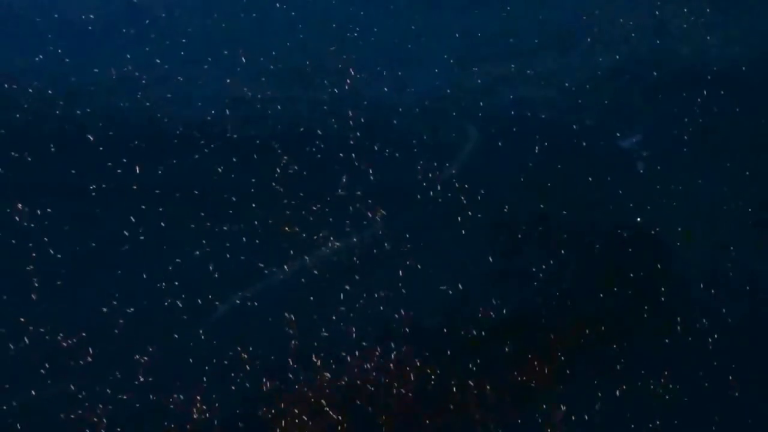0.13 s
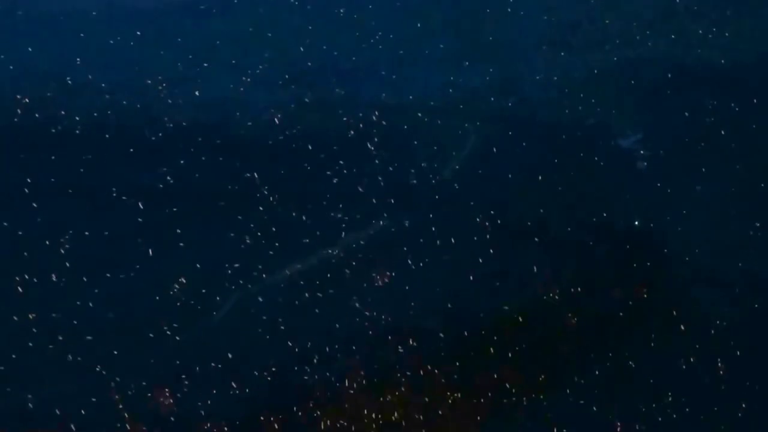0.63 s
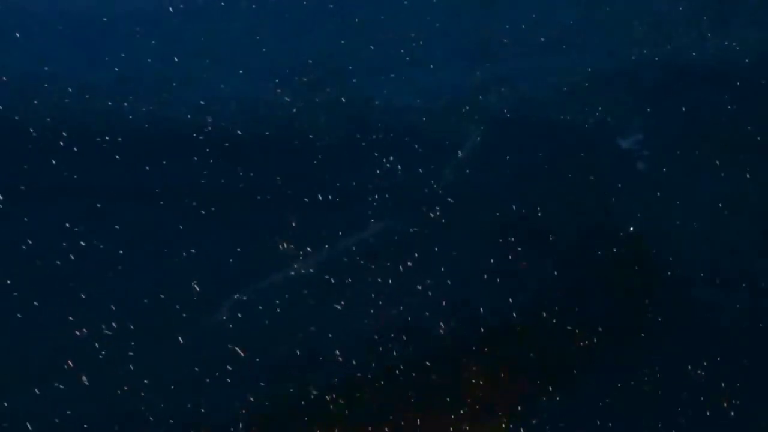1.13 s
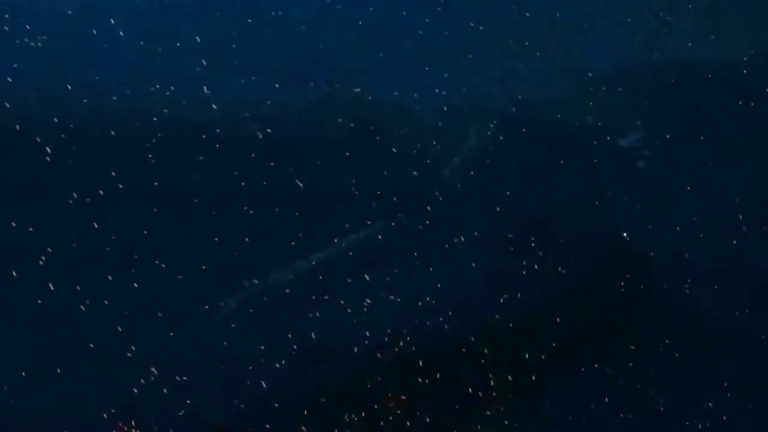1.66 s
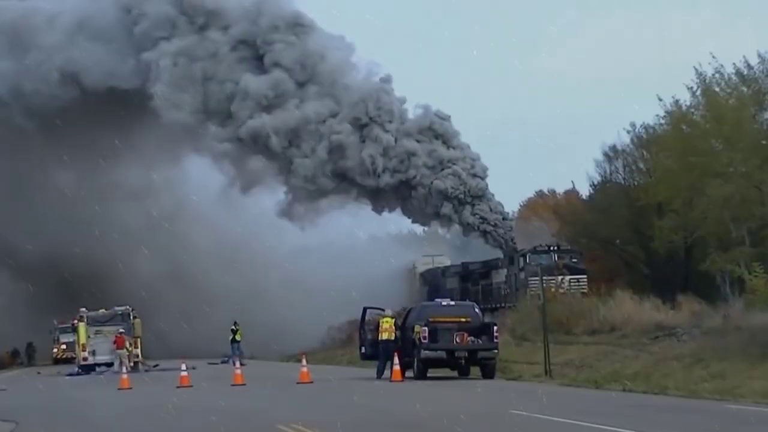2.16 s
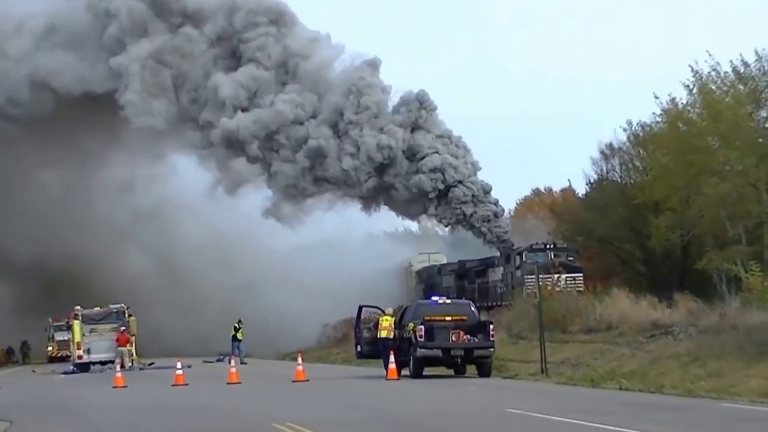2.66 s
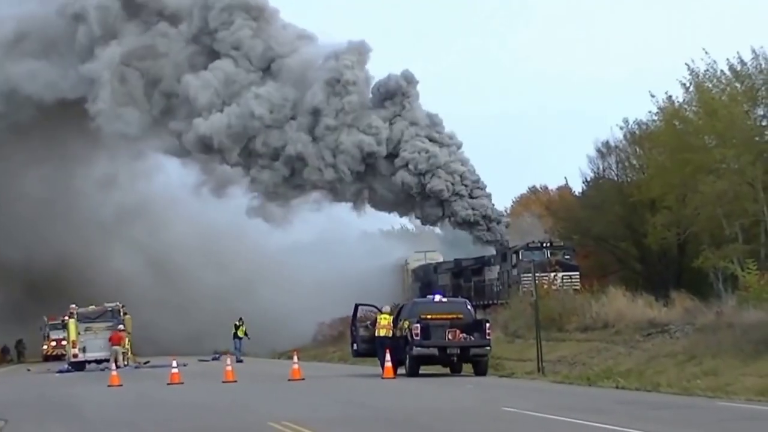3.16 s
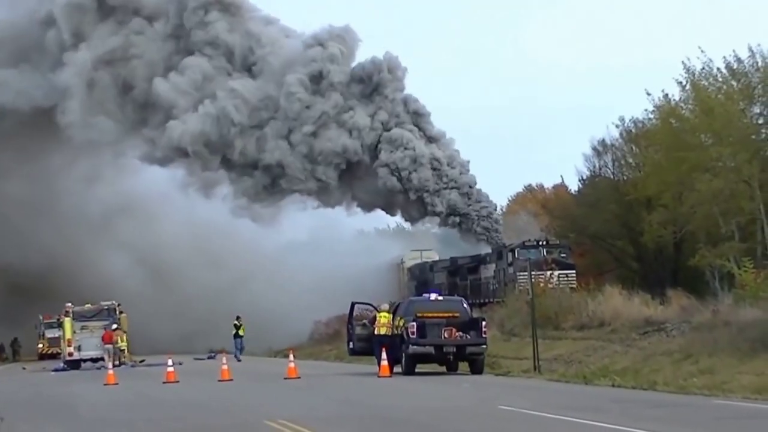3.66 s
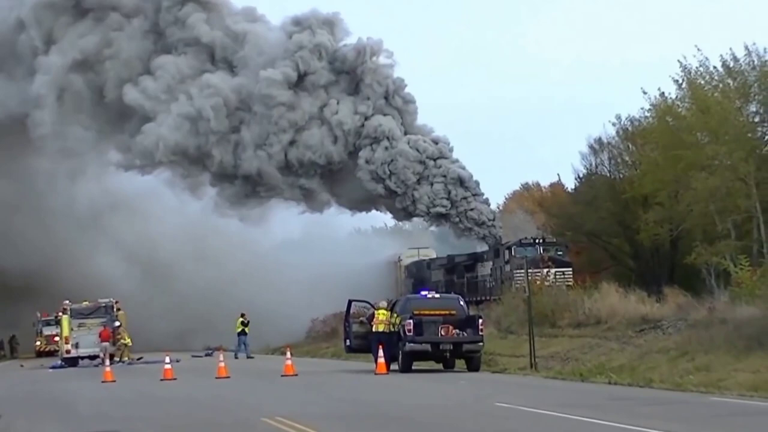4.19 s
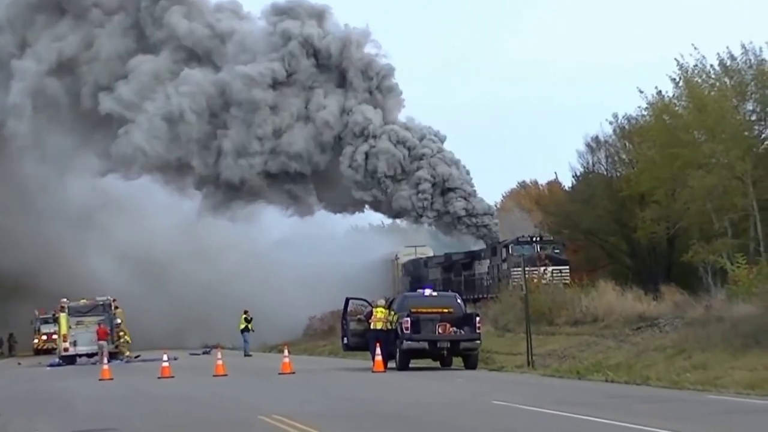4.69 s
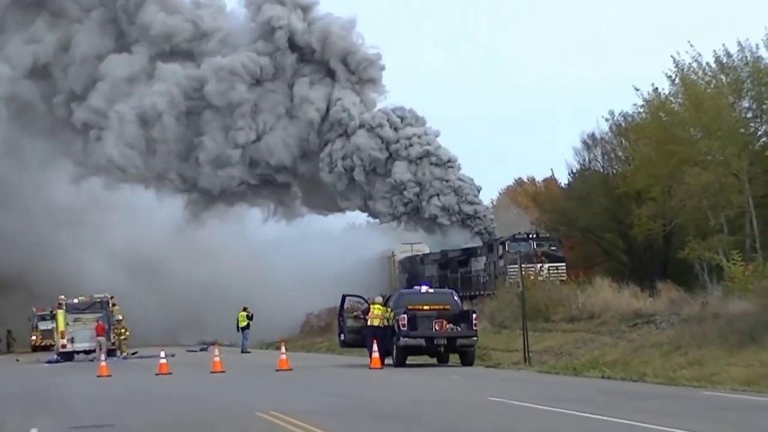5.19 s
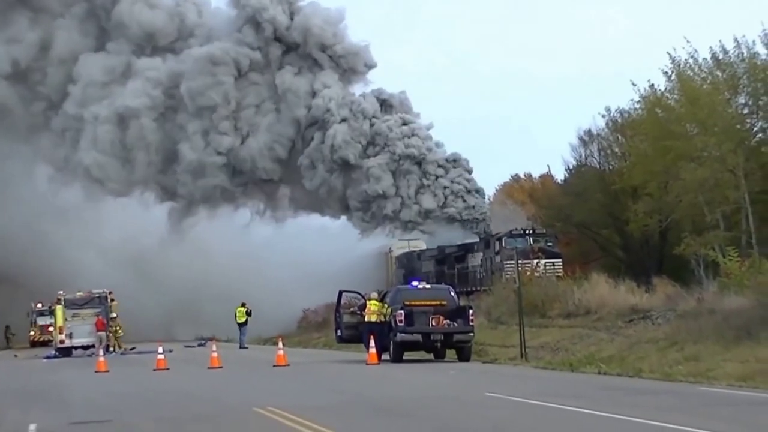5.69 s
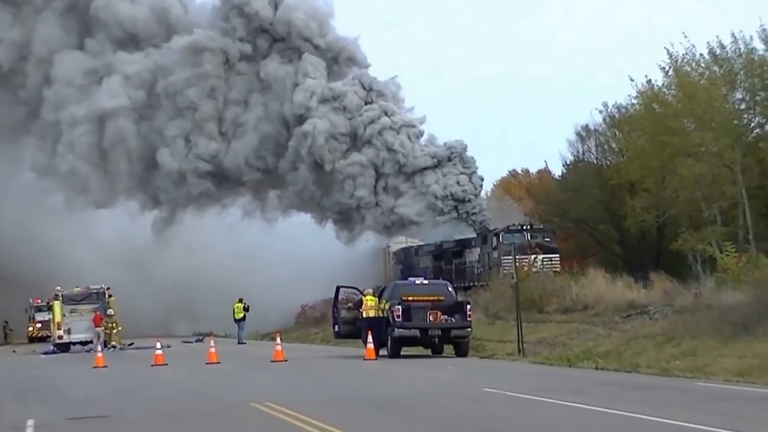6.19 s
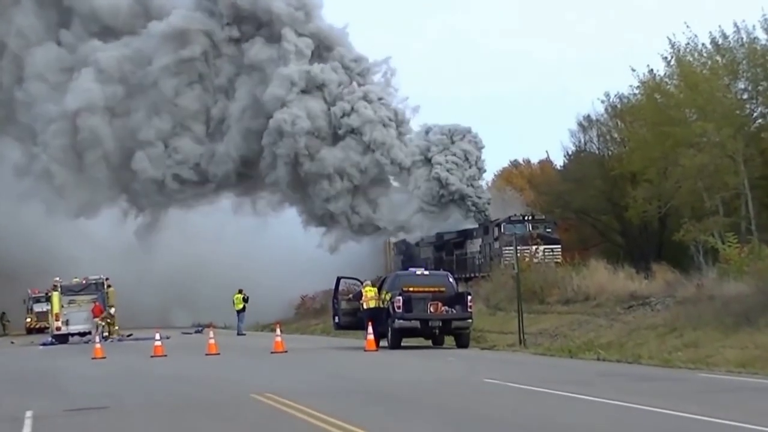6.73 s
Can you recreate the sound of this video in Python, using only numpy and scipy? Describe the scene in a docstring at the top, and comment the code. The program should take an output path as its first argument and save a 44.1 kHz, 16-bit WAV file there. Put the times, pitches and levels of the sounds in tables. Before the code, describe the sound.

From 0 s a steam locomotive works hard, loud and near: sharp, turbulent exhaust blasts about every 0.12 s, four to a wheel turn, over a continuous steam roar. The chuffs vary slightly; some are crisp and bright, others darker and heavier, with a hollow chimney colour. From about 1.5 s they fade, gone by 2.6 s, as a far quieter outdoor roadside replaces them. There a diesel truck engine runs at a nearly steady high idle, a buzzing mid-low hum with soft, fuzzy clatter. A wide airy hiss climbs to its height around 4 to 4.5 s, its brighter part peaking later, then sinks toward the end near 6.8 s. Faint microphone hiss stays beneath. Tiny dry ticks sound close by at about 2.7, 6.2 and 6.5 s, the last two clearer. The stereo image is fairly narrow, without noticeable echo.

```python
"""At first a steam locomotive works hard: four sharp exhaust blasts a wheel turn over a roar of steam,
made as turbulent noise whose power pulses with each blast. It dissolves into a roadside, where
a diesel truck engine runs at a nearly steady high idle, a sum of cycle harmonics and noise clatter.
A wide noise hiss swells and sinks again, over a faint microphone hiss.
A few small ticks, decaying sines, land near the microphone."""
import sys
import numpy as np
from scipy import signal
from scipy.fft import rfft, irfft
from scipy.io import wavfile
from scipy.ndimage import uniform_filter1d

SR = 44100
rng = np.random.default_rng(int(sys.argv[2]) if len(sys.argv) > 2 else 0)


def gain_from_db(level_db):
    """Convert decibel levels to linear amplitude factors (20 dB per decade)."""
    decades = np.asarray(level_db, float) / 20
    return 10 ** decades


def persist_wave(psi):
    """Save psi, clipped to +-1, as 16-bit WAV."""
    counts = np.round(np.clip(psi, -1, 1) * 32767).astype(np.int16)
    wavfile.write(sys.argv[1], SR, np.atleast_2d(counts).T)


N = 301637  # samples
T, HZ = np.arange(N) / SR, np.fft.rfftfreq(N, 1 / SR)
FRAME_T, FRAME_HZ = np.arange(N // 64 + 5) * 64 / SR, np.fft.rfftfreq(256, 1 / SR)  # noise grid

# Exhaust blasts. Each row: nominal time in seconds, level in dB, treble in dB before its pitch weight.
BLASTS = [(0.038, -22, 7.5), (0.151, -23, 7), (0.276, -21, 1), (0.393, -22, 6), (0.509, -23.5, 10),
          (0.623, -18.5, -6.5), (0.742, -19.5, -3.5), (0.863, -22, -2), (0.98, -19.5, -6.5),
          (1.092, -21.5, -4.5), (1.213, -21.5, 0.5), (1.329, -24, 13.5), (1.448, -22, 13),
          (1.561, -21.5, 7), (1.683, -17.5, -12.5), (1.803, -19.5, -6.5), (1.917, -18, -5.5),
          (2.033, -17.5, -7.5), (2.155, -17.5, -7), (2.269, -20.5, -2.1), (2.39, -19.5, -2),
          (2.51, -22.5, 3)]
# The four cylinder ends in turn. Each row: valve opening in seconds, bark at the front in dB and
# bass in dB, both before their pitch weights.
CYLINDER_ENDS = [(0.064, 5.5, -2.5), (0.049, 4, -5.5), (0.052, 1, -1), (0.07, 10, 0)]
# Decay of a blast. Each row: pitch in Hz, sag from the start in dB/s, added fall once shut in dB/s.
BLAST_DECAY = [(105.7, 39, 60), (400, 110, 200), (1210, 53, 259), (4030, 21, 325), (10000, 73, 292)]
# Onset of a blast. Each row: pitch in Hz, amplitude time constant in seconds.
BLAST_RISE = [(100, .02), (400, .005), (1500, .003), (4000, .008), (10000, .02)]
# Pitch weights of treble, bass and bark. Each row: pitch in Hz, factor.
TREBLE_WEIGHT = [(1500, 0.17), (4000, 0.38)]
BASS_WEIGHT = [(300, 0.96), (800, 0.079)]
BARK_WEIGHT = [(200, 0.95), (600, 0.88), (2000, 0.81), (5000, 0.61)]
# Steady roar between blasts. Each row: pitch in Hz, level in dB relative to ROAR_DB.
ROAR_COLOUR = [(100, 10.0), (500, -1.5), (8000, -2.0)]
# Steam spectrum. Each row: pitch in Hz, relative density in dB per Hz.
STEAM = [(15, -59), (30, -23.5), (79, -19.5), (126, -11), (193, -13), (313, -11), (536, 0), (800, -2),
         (1200, -1.5), (1850, -7), (3500, -13), (6540, -17), (11800, -24.5), (13500, -31), (15500, -41)]
# Chimney resonances. Each row: centre in Hz, width in Hz, boost in dB.
CHIMNEY = [(124, 20, 3.5), (262.5, 71, 6), (409, 120, 5), (534, 35, 4.5), (1180, 240, 2), (2390, 530, 2),
           (3740, 500, 1.5), (7070, 1900, 1.5)]
# Steam likeness between the ports. Each row: pitch in Hz, correlation.
STEAM_SAME = [(30, .96), (60, .93), (290, .94), (1410, .95), (3100, .78), (6820, .35), (11500, .35)]
# Steam balance. Each row: pitch in Hz, left over right in dB.
STEAM_PAN = [(60, -.7), (380, -1.5), (1300, -1.3), (2380, -.8), (4400, .7), (8120, 1.1)]
# Crossfade: its start and its end in seconds.
DISSOLVE_S = (1.53, 2.586)
# Engine cycle rate. Each row: time in seconds, rate in Hz.
CYCLE = [(0., 12.4), (2.65, 12.471), (6.84, 12.577)]
# Strong engine harmonics. Each row: multiple of the cycle rate, level in dB rms before the port balance.
STRONG_ORDERS = [(5, -75), (9, -72), (10, -71), (12, -63), (13, -65), (14, -60), (16, -62), (21, -66),
                 (22, -63), (23, -64), (26, -65), (31, -70), (34, -67), (36, -63), (37, -65), (39, -64),
                 (43, -62), (44, -61), (45, -59), (48, -56), (49, -59), (52, -55), (54, -59), (60, -58),
                 (62, -61), (63, -57), (66, -55), (70, -57), (72, -58), (78, -64)]
# Mean level of the other harmonics. Each row: pitch in Hz, level in dB rms before the port balance.
OTHER_ORDERS = [(40, -111), (110, -73), (250, -72), (380, -73.5), (520, -64.5), (700, -66), (900, -65.5),
                (1050, -75.5), (1500, -68), (1900, -93)]
# Clatter spectrum. Each row: pitch in Hz, relative density in dB per Hz.
CLATTER = [(15, -56), (25, -28), (124, -20), (168, -11), (237, -7.5), (326, -6), (366, -2), (439, -5),
           (816, -2.5), (1030, -6.5), (1550, -5.5), (2510, -14.5), (6000, -29.5), (7800, -62),
           (13200, -120)]
# Fuzzy band spectrum. Each row: pitch in Hz, relative density in dB per Hz.
FUZZY_BAND = [(1000, -90), (1330, -30), (1440, -6), (1515, 0), (1600, -5), (1750, -30), (2300, -90)]
# Wide hiss spectrum. Each row: pitch in Hz, relative density in dB per Hz.
HISS = [(700, -29), (1300, -21), (1900, 0), (2800, 2), (4400, -9), (5900, -14.5), (6500, -25.5),
        (8000, -33), (11000, -49)]
# Swell of the hiss, its treble later and steeper. Each row: pitch in Hz, crest time in seconds,
# crest in dB, climb in dB/s, sink in dB/s, resting level in dB; both levels before the colour.
SWELL = [(3000, 4.1, -43.5, 3, 4, -61), (4220, 4.53, -39, 7, 12, -69)]
# Shared roadside colour. Each row: centre in Hz, width in Hz, gain in dB.
ROADSIDE_COLOUR = [(392, 190, -12), (1016, 73, -8.5), (2045, 590, 5.5), (3755, 260, -6.5), (4440, 390, 7.5),
                   (6180, 170, -1)]
# Roadside likeness between the ports. Each row: pitch in Hz, correlation.
ROAD_SAME = [(30, 0.7), (130, 1), (640, 1), (1410, 1), (3100, .94), (4400, 0.75), (5700, 0.67)]
# Roadside balance. Each row: pitch in Hz, left over right in dB.
ROAD_PAN = [(60, 1), (200, -3.5), (700, -1.2), (2380, -2), (5700, -2)]
# Microphone hiss spectrum. Each row: pitch in Hz, relative density in dB per Hz.
SELF_NOISE = [(7500, 0), (10000, -2), (13000, -4.5), (14700, -6), (15400, -14), (17000, -30)]
# Ticks. Each row: start in seconds, amplitude before decay and soft start in dB, pitch in Hz.
TICKS = [(2.697, -39, 5500), (6.194, -30, 3700), (6.477, -26, 4000)]

BARK_S, ROAR_DB = .014, -28.5  # the bark dies fast; steam roars on between the blasts
STEAM_LEAD_S = 3.5e-5  # the left port hears first
STEAM_MONO_HZ, ROAD_MONO_HZ = 11700, 5500  # both ports are alike above these
CLATTER_DB, SELF_NOISE_DB = -41, -70
FUZZY_CREST_S, FUZZY_DB, FUZZY_CLIMB_DB_PER_S = 3.8, -49.5, 3


def evened(x):
    """Normalisation: scales to rms 1."""
    return x / np.sqrt(np.mean(x ** 2) + 1e-20)


def curve(points, t=T):
    """Linear interpolation of a table in time."""
    return np.interp(t, *np.transpose(points))


def read(points, hz=HZ):
    """Linear interpolation of a table on a log-frequency axis."""
    f, value = np.transpose(points)
    return np.interp(np.log(hz + 1), np.log(f + 1), value)


def bumps(modes, hz=HZ):
    """Resonance: each mode adds a Lorentzian bump or dip in dB."""
    return sum(db / (1 + (2 * (hz - f) / width) ** 2) for f, width, db in modes)


def smoothed(x, rows, columns):
    """Correlated randomness: moving averages along both axes, scaled to rms 1."""
    return evened(uniform_filter1d(uniform_filter1d(x, size=rows, axis=0), size=columns, axis=1))


def turbulence(field, patchy_db, flicker_db):
    """Modulated noise: two unrelated noises share a time-by-pitch gain with patches and wide flicker."""
    frames = len(FRAME_T)
    a, b, c, d, patches = rng.standard_normal((frames, 129, 5)).T
    patches = smoothed(patches, rows=4, columns=24)
    flicker = smoothed(rng.standard_normal((frames, 129)).T, rows=50, columns=10)
    gain = field * gain_from_db(patchy_db * patches + flicker_db * flicker)
    first, second = a + 1j * b, c + 1j * d
    unit = np.sqrt(np.mean(signal.istft(first, nperseg=256, noverlap=192)[1] ** 2))
    pair = signal.istft(gain * np.array([first, second]), nperseg=256, noverlap=192)[1]
    return pair[:, :N] / unit


def speckle(pair, depth_db):
    """Narrow-band modulation: thin bands swell and sink for a moment, as eddies ring and die."""
    z = signal.stft(pair, nperseg=2048, noverlap=1536)[2]
    streaks = uniform_filter1d(rng.standard_normal(z.shape[:0:-1]).T, size=6, axis=1)
    gain = gain_from_db(depth_db * evened(streaks))
    return signal.istft(z * evened(gain), nperseg=2048, noverlap=1536)[1][:, :N]


def at_ports(pair, colour_db, same, pan, mono_hz, lead_s=0):
    """Partial coherence: spreads noise over two microphone ports; the colour holds for their sum."""
    a, b = rfft(speckle(pair, depth_db=2.5))
    likeness = np.clip(read(same), 0, 1)
    lead = 2 * np.pi * HZ * lead_s  # radians
    left = a * np.exp(1j * lead) * gain_from_db(read(pan) / 2)
    right = (likeness * a + np.sqrt(1 - likeness ** 2) * b) / gain_from_db(read(pan) / 2)
    mid = (left + right) / 2
    side = (left - right) / 2 * (HZ < mono_hz)
    gain = evened(gain_from_db(colour_db)) / np.sqrt((1 + likeness * np.cos(lead)) / 2)
    return irfft(gain * np.array([mid + side, mid - side]), N)


def locomotive():
    """Pulsed jet noise: each blast barks, sags, then falls as its valve shuts; powers add to the roar."""
    f, *columns = np.transpose(BLAST_DECAY)
    sag, fall = (np.interp(np.log(FRAME_HZ + 1), np.log(f), c)[:, None] for c in columns)
    rise = read(BLAST_RISE, FRAME_HZ)[:, None]
    treble_weight = read(TREBLE_WEIGHT, FRAME_HZ)[:, None]
    bass_weight = read(BASS_WEIGHT, FRAME_HZ)[:, None]
    bark_weight = read(BARK_WEIGHT, FRAME_HZ)[:, None]
    roar_db = ROAR_DB + read(ROAR_COLOUR, FRAME_HZ)[:, None]
    power = np.ones(len(FRAME_T)) * gain_from_db(2 * roar_db)
    shifts = rng.standard_normal((len(BLASTS), len(FRAME_HZ)))
    shifts_db = evened(uniform_filter1d(shifts, size=3, axis=1))  # no two blasts have quite the same colour
    for k, ((s, db, treble_db), shift_db) in enumerate(zip(BLASTS, shifts_db)):
        open_s, bark_db, bass_db = CYLINDER_ENDS[k % len(CYLINDER_ENDS)]
        start = s - .003
        near = slice(*np.searchsorted(FRAME_T, [start, start + .3]))
        age = FRAME_T[near] - start
        colour_db = db + treble_weight * treble_db + bass_weight * bass_db + shift_db[:, None]
        bark = bark_weight * bark_db * np.exp(-age / BARK_S)
        level_db = colour_db + bark - sag * age - fall * np.maximum(age - open_s, 0)
        power[:, near] += (gain_from_db(level_db) * (1 - np.exp(-age / rise))) ** 2
    steam = turbulence(np.sqrt(power), patchy_db=0.43, flicker_db=0.74)
    colour_db = read(STEAM) + bumps(CHIMNEY)
    return at_ports(steam, colour_db, STEAM_SAME, STEAM_PAN, STEAM_MONO_HZ, STEAM_LEAD_S)


def dissolve():
    """Linear crossfade: the share of the roadside, from 0 to 1."""
    return np.interp(T, DISSOLVE_S, [0, 1])


def engine_orders():
    """Periodicity: knocks repeating each engine cycle give its harmonics, each wavering slowly."""
    orders = np.arange(4, 150)
    chance = rng.standard_normal((len(orders), 4))
    level_db = read(OTHER_ORDERS, orders * CYCLE[1][1]) + 0.74 * chance[:, 0]
    for order, db in STRONG_ORDERS:
        level_db[order - orders[0]] = db
    step = 8  # computed at every eighth sample
    t = T[::step]
    turns = np.cumsum(curve(CYCLE, t)) * step / SR
    slow = rng.standard_normal((N // 2048 + 9, len(orders), 2))
    slow = evened(uniform_filter1d(uniform_filter1d(slow, size=7, axis=0), size=4, axis=0))
    slow_t = np.arange(len(slow)) * 2048 / SR
    out = np.zeros((2, len(turns)))
    for i, order in enumerate(orders):
        real, imaginary = (np.interp(t, slow_t, slow[:, i, j]) for j in (0, 1))
        loose = .15 + .007 * order  # higher multiples change more from cycle to cycle
        waver = (1 + loose * (real + 1j * imaginary)) / np.sqrt(.5 + loose ** 2)
        tone = np.exp(1j * (2 * np.pi * order * turns + np.arctan2(*chance[i, 1:3])))
        # reflections shift each tone between the ports
        tone = tone * np.exp(.12j * chance[i, 3] * np.array([[1], [-1]]))
        out += gain_from_db(level_db[i]) * (waver * tone).real
    return signal.resample_poly(out, step, 1, axis=1)[:, :N] * gain_from_db([[-.45], [.45]])


def at_roadside(pair, spectrum):
    """Linear filtering: every roadside noise takes on the same colour and spread."""
    colour_db = read(spectrum) + bumps(ROADSIDE_COLOUR)
    return at_ports(pair, colour_db, ROAD_SAME, ROAD_PAN, ROAD_MONO_HZ)


def clatter():
    """Broadband noise: the engine's clatter holds a steady mean level."""
    noise = turbulence(np.ones(len(FRAME_T)), patchy_db=0.36, flicker_db=0.9)
    return at_roadside(gain_from_db(CLATTER_DB) * noise, CLATTER)


def fuzzy_band():
    """Band-limited noise: a fuzzy band in the clatter grows exponentially, then holds."""
    level_db = FUZZY_DB - FUZZY_CLIMB_DB_PER_S * np.maximum(FUZZY_CREST_S - FRAME_T, 0)
    return at_roadside(turbulence(gain_from_db(level_db), patchy_db=2.2, flicker_db=1.5), FUZZY_BAND)


def swelling_hiss():
    """Power addition: a hiss that climbs and sinks exponentially joins a steady resting hiss."""
    f, *columns = np.transpose(SWELL)
    crest_s, crest_db, climb, sink, rest_db = (np.interp(FRAME_HZ, f, c)[:, None] for c in columns)
    before, after = np.maximum(crest_s - FRAME_T, 0), np.maximum(FRAME_T - crest_s, 0)
    swell_db = crest_db - climb * before - sink * after
    level = np.hypot(gain_from_db(swell_db), gain_from_db(rest_db))
    return at_roadside(turbulence(level, patchy_db=0.3, flicker_db=0.9), HISS)


def microphone_hiss():
    """Self-noise: steady filtered noise, the same at both ports."""
    spectrum = rfft(rng.standard_normal(N)) * evened(gain_from_db(read(SELF_NOISE)))
    return gain_from_db(SELF_NOISE_DB) * irfft(spectrum, N)


def roadside():
    """Superposition: the engine, the swelling hiss and the microphone's faint hiss add."""
    return engine_orders() + clatter() + fuzzy_band() + swelling_hiss() + microphone_hiss()


def ticks():
    """Damped oscillation: tiny dry clicks, a few cycles long, with a soft start."""
    out, t = np.zeros(N), np.arange(300) / SR
    for s, db, hz in TICKS:
        at = round(s * SR)
        decay = gain_from_db(db - 60 * t / .003)  # 60 dB in 3 ms
        soft_start = (1 - np.exp(-t / .00013)) ** 2
        out[at:at + len(t)] += decay * soft_start * np.sin(2 * np.pi * hz * t)
    return out


def scene():
    """Superposition: the locomotive dissolves into the roadside, and the ticks add at full level."""
    share = dissolve()
    return (1 - share) * locomotive() + share * roadside() + ticks()


def top_cut(x):
    """Nothing passes above the cut-off."""
    return signal.sosfilt(signal.butter(12, 15610, fs=SR, output="sos"), x)


def record(dry):
    """Identity up to the last stage: the finished mix is passed on at its own level."""
    return top_cut(dry)


dry = scene()
out = record(dry)
persist_wave(out)
```